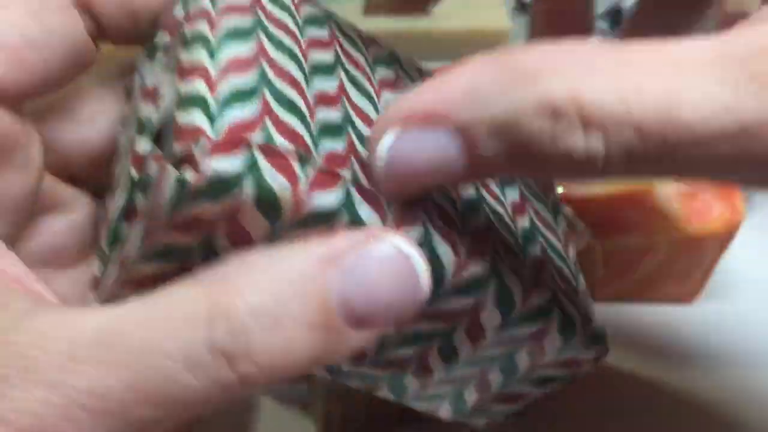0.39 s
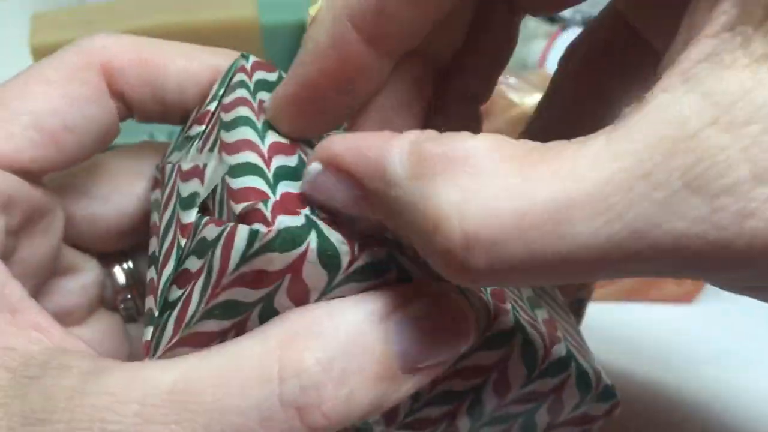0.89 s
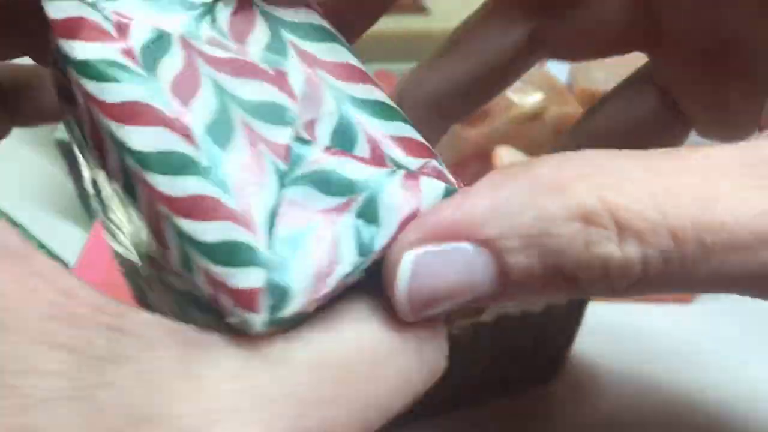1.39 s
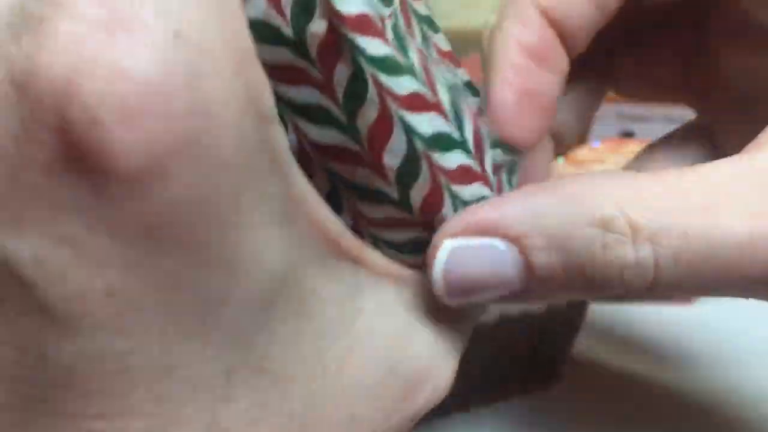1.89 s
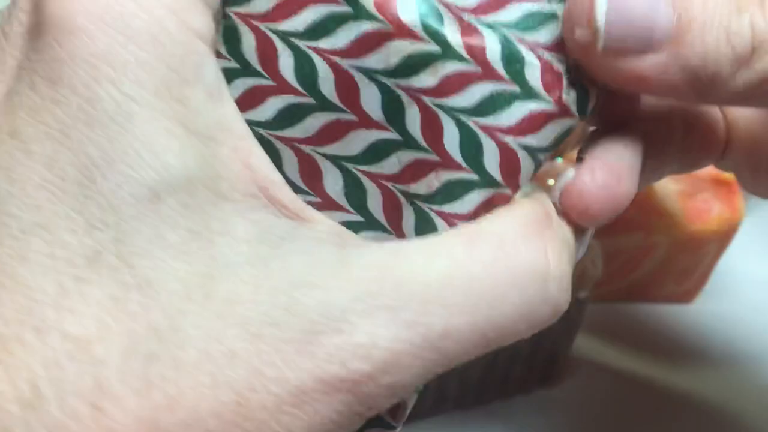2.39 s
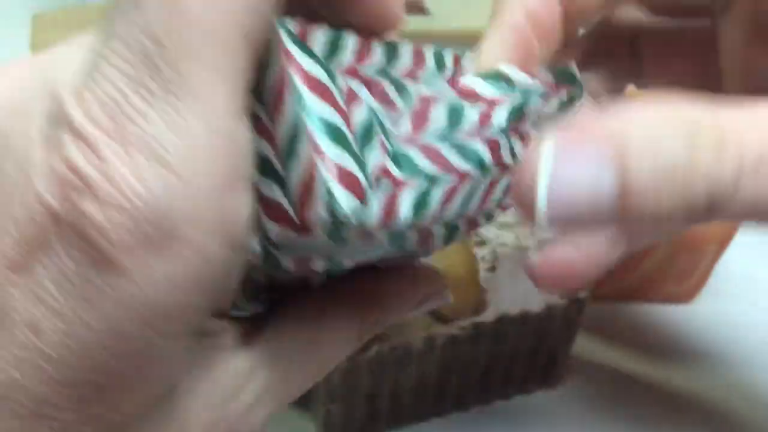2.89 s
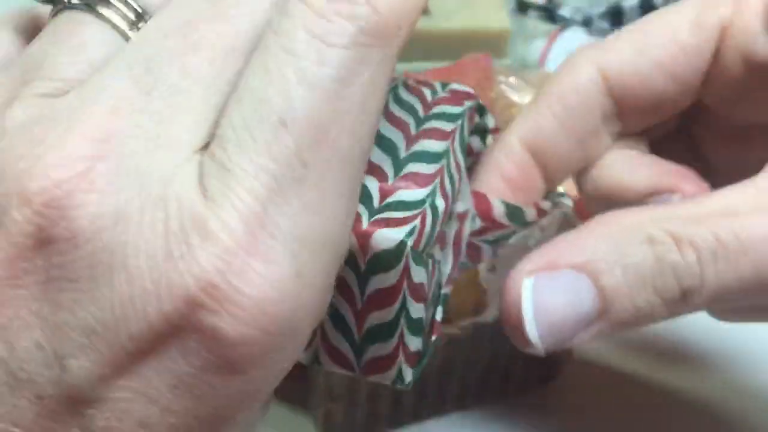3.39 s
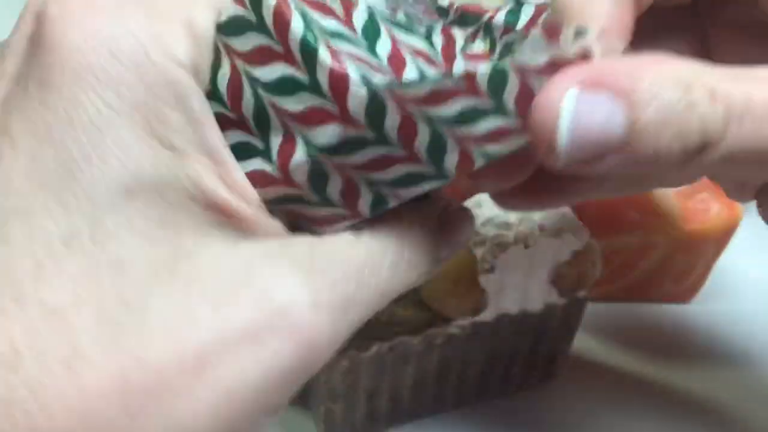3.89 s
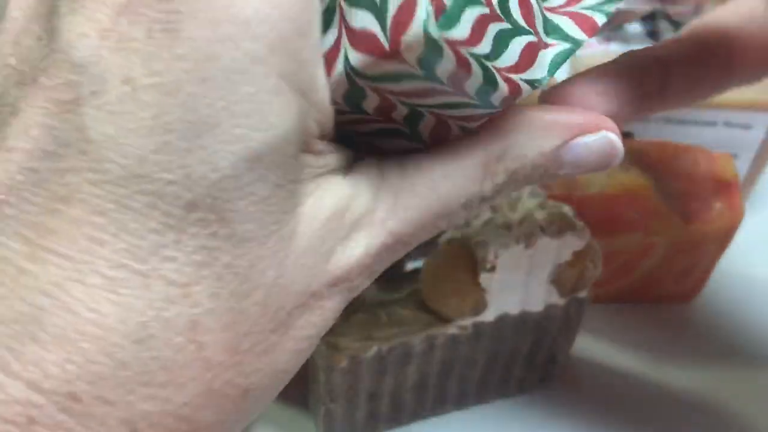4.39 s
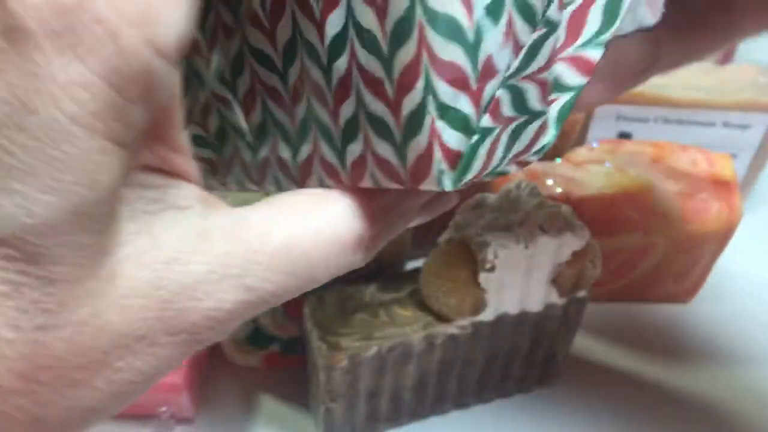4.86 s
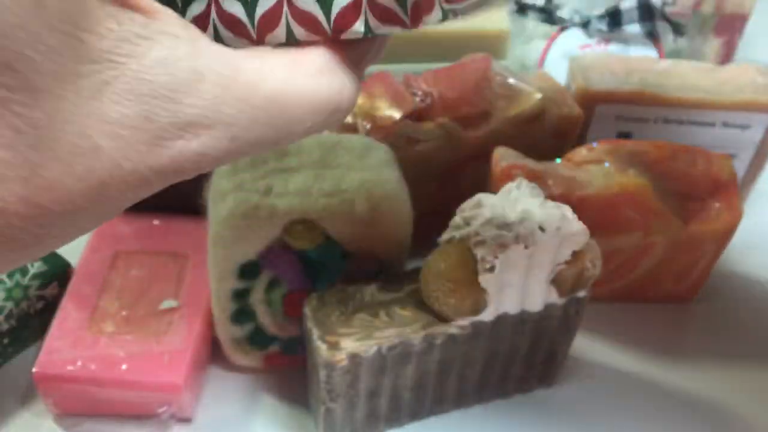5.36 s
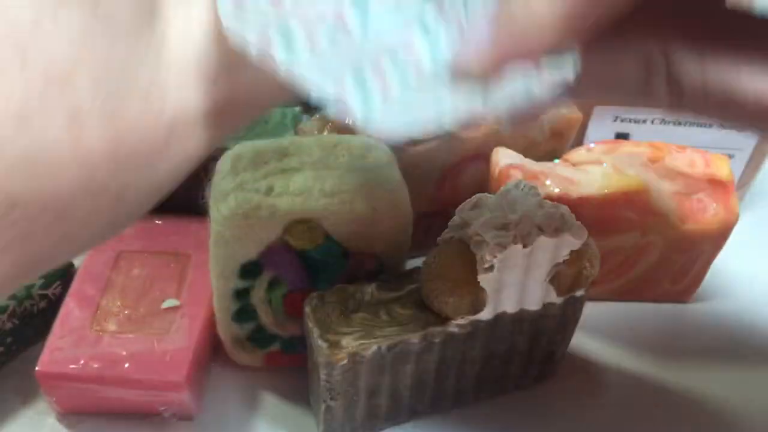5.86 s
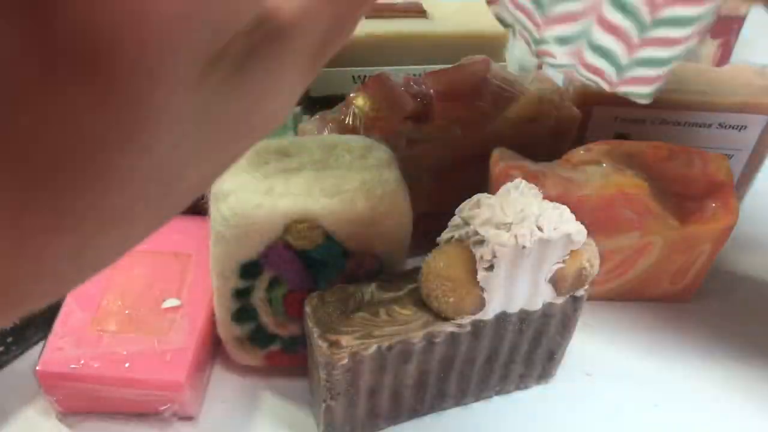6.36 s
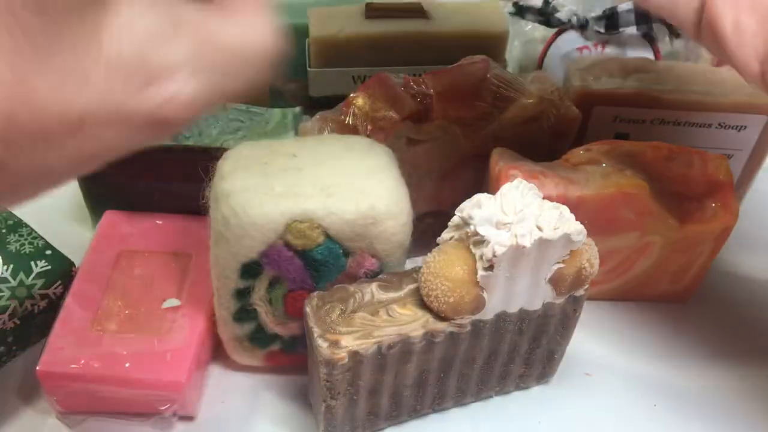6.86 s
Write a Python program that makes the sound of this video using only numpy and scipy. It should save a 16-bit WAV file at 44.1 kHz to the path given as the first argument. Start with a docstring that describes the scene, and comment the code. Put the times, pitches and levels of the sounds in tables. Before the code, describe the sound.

Stiff glossy gift paper crackles and snaps close up as fingers peel it off a small bar, swelling into loud crinkly rushes near the end.

```python
"""Ringing snaps and a rush of tiny crackles: fingers turn a small bar and peel stiff glossy gift paper off it.
Each snap is damped sines with noise; crackles and sliding hiss are shaped noise that swells with the hands.
The hands bump softly as low damped sines and dull noise, close to a phone microphone,
and a still room answers briefly and rumbles underneath."""
import sys
import numpy as np
from scipy import signal
from scipy.fft import rfft, irfft, next_fast_len
from scipy.io import wavfile
from scipy.ndimage import map_coordinates

SR = 44100
rng = np.random.default_rng(int(sys.argv[2]) if len(sys.argv) > 2 else 0)


def voltage_ratio(level):
    """Linear amplitude factor for a level in decibels (scalar or array-like)."""
    return 10 ** (np.asarray(level, float) / 20)


def output_pcm(signal):
    """Save a mono or channel-first signal as 16-bit PCM at the path in sys.argv[1].

    Samples are clipped to [-1, 1] before scaling.
    """
    pcm = np.clip(np.atleast_2d(signal).T, -1, 1) * 32767
    wavfile.write(sys.argv[1], SR, np.round(pcm).astype(np.int16))


N = 319725

# buckling creases: time_s [s], level_db [dB], ring_hz [Hz], crack_db [dB over level_db]
CREASES = [(0.037, -28, 3250, -10), (0.059, -25, 3020, -17), (0.0783, -17, 3260, -9.5),
           (0.106, -11.5, 3500, -6), (0.136, -24, 3340, -6), (0.145, -19, 3680, -1), (0.153, -25, 3300, -1),
           (0.1741, -24, 5660, 0), (0.199, -18, 3440, -6.5), (0.2328, -24, 4070, -22),
           (0.2568, -18, 3330, -9), (0.2612, -16.5, 3640, -17), (0.2787, -16, 3230, -11),
           (0.341, -28.5, 3150, -3), (0.4125, -23, 1880, -34), (0.4473, -27.5, 3730, -17),
           (0.511, -22.5, 3640, -13), (0.5153, -19, 4050, -14.5), (0.537, -22.5, 3560, -13),
           (0.5689, -23, 2330, -19), (0.5715, -17.5, 2430, -23), (0.6272, -32.5, 880, 5.5),
           (0.674, -35, 3280, -7), (0.715, -40.5, 3950, 1), (0.7711, -15, 3270, -26),
           (0.8352, -26, 1970, -23), (0.867, -32.5, 1600, -7.5), (0.9686, -26, 1970, -9),
           (0.9798, -25.5, 3000, -21), (1.0409, -10, 2110, -47), (1.071, -30, 2490, 2),
           (1.077, -32, 1990, 9), (1.168, -32, 2200, -25), (1.19, -26, 2080, -22), (1.2003, -29.5, 1770, 5),
           (1.2074, -19, 6240, -19), (1.2217, -27, 2350, 3), (1.2216, -29.5, 870, -34),
           (1.2542, -22, 4300, -12), (1.2978, -23.5, 4200, 3), (1.325, -35.5, 2430, 1),
           (1.477, -22.5, 3040, -13), (1.485, -17.5, 5200, -40), (1.654, -22, 3170, -20),
           (1.7837, -32, 4100, 7), (1.788, -26, 1410, -5), (1.8496, -22.5, 3500, -10.5),
           (1.9441, -25, 3450, -6), (2.0239, -32, 3340, 11), (2.059, -17.5, 3380, -40),
           (2.066, -13.5, 2120, -32), (2.078, -6, 3200, -26), (2.112, -20, 3680, -1.5),
           (2.139, -17.5, 2530, -14), (2.166, -17, 3300, -18), (2.2301, -7.5, 3520, -40),
           (2.2698, -17.5, 1610, -6), (2.2765, -10.5, 2410, -19), (2.3023, -16, 2260, -28),
           (2.308, -17.5, 1890, -7), (2.314, -11, 3340, -22), (2.344, -12, 3300, -28),
           (2.35, -14, 2440, -17), (2.3722, -14.5, 1630, -13), (2.3805, -19, 3420, -11),
           (2.4218, 0, 3080, -25), (2.4613, -31, 3400, 12), (2.4844, -5, 3010, -67),
           (2.511, -14.5, 2440, -45), (2.5187, -20, 3080, -23), (2.5523, -8.5, 2940, -24),
           (2.602, -6.5, 2760, -21.5), (2.637, -13, 3340, -16), (2.652, -9, 2500, -31),
           (2.6548, -6, 2500, -54), (2.659, -10, 3050, -38), (2.691, -19, 4100, -12),
           (2.726, -20.5, 3500, -6.5), (2.748, -14.5, 3400, -13), (2.8589, -16.5, 2800, -13),
           (2.8712, -16.5, 2860, -13), (2.9005, -12.5, 2740, -28), (2.9534, -18, 2920, -29),
           (3.0071, -13, 3450, -19), (3.024, -29, 2430, -8), (3.035, -16, 2930, -5),
           (3.066, -16.5, 1680, -10), (3.075, -7.5, 2660, -17), (3.082, -12, 3200, -7),
           (3.12, -15, 4500, -37), (3.128, -18, 3160, -21), (3.1465, -20, 4300, -6.5),
           (3.1534, -13.5, 3320, -24), (3.158, -8, 2680, -30), (3.185, -25.5, 3040, 5),
           (3.196, -9.5, 2900, -28), (3.2, -7, 3060, -13), (3.2833, -23, 3450, -11),
           (3.2986, -27, 3250, -6), (3.308, -20, 3830, -6.5), (3.316, -12, 3580, -10.5),
           (3.339, -19, 3180, -20), (3.3487, -17.5, 2900, -12), (3.386, -20.5, 3600, -4),
           (3.4112, -20.5, 5500, -17), (3.4367, -19, 3160, -14), (3.4414, -21.5, 3380, 0),
           (3.471, -33, 3480, 7.5), (3.533, -5, 3230, -28), (3.554, -4.5, 3570, -29),
           (3.6181, -13, 4140, -3.5), (3.6304, -10.5, 3880, -18), (3.64, -17, 3780, -4),
           (3.6856, -4.5, 3900, -35), (3.7287, -7, 2600, -1.5), (3.7651, -11.5, 1060, -7),
           (3.7832, -9, 3190, -9), (3.789, -7.5, 2770, -12), (3.8035, -3, 5440, -15),
           (3.8131, -13, 1320, -18), (3.8374, -17, 2520, 0), (3.844, -13.5, 1640, -13),
           (3.8546, -10.5, 2950, -19), (3.9336, -15.5, 2750, -55), (3.9703, -11.5, 3320, -28),
           (3.999, -13.5, 3250, -20), (4.016, -13, 3000, -11), (4.0388, -20, 2110, -16),
           (4.1028, -15, 3460, -15), (4.1156, -7, 3270, -34), (4.163, -20.5, 2540, -5.5),
           (4.185, -18.5, 3140, -16), (4.225, -17.5, 2500, -11), (4.311, -13, 2270, -37),
           (4.37, -6.5, 3360, -16), (4.4186, -18.5, 3160, -23), (4.472, -18, 2640, -6),
           (4.4986, -13, 3070, -16), (4.5688, -22.5, 3160, -42), (4.613, -19, 3260, -22),
           (4.6243, -23, 3250, 2), (4.6409, -10, 3400, -13.5), (4.6617, -12, 1660, -8.5),
           (4.6989, -17, 1380, -8), (4.732, -15.5, 3300, -10), (4.741, -7, 2120, -15),
           (4.804, -18.5, 3400, -11), (4.812, -16.5, 2480, -11), (4.8431, -13.5, 2320, -21),
           (4.865, -16.5, 1480, -33), (4.891, -18, 3300, -9), (4.9055, -6.5, 2230, -22),
           (4.9173, -12.5, 3230, -7), (4.96, -20.5, 3430, -13), (5.0016, -19.5, 2500, -5),
           (5.0656, -29, 3320, -20), (5.08, -20, 1370, -15), (5.121, -33, 2470, 4), (5.146, -23, 3100, -1),
           (5.177, -14, 3150, -13), (5.238, -16, 4130, -12), (5.246, -19, 3050, -13),
           (5.289, -20, 2050, -10), (5.311, -28, 3180, -2), (5.357, -14.5, 3300, 1),
           (5.371, -16, 2800, -14), (5.389, -9, 2800, -30), (5.402, -11, 2900, -24), (5.447, -8, 2530, -34),
           (5.471, -22.5, 4900, 4), (5.5106, -20.5, 2980, -7), (5.573, -27, 2850, -28),
           (5.6218, -20.5, 2900, -12), (5.666, -35.5, 3660, 13), (5.6822, -37.5, 6037, 18.5),
           (5.707, -25.5, 3320, -11), (5.764, -18, 2780, -20), (5.8323, -16, 2800, 7),
           (5.8517, -20.5, 2410, 5), (5.8614, -10, 3700, -2), (5.9575, -18, 3980, -36),
           (6.0142, -11.5, 2900, -16), (6.0282, -28, 2250, -21), (6.1646, -17.5, 3080, -12),
           (6.1725, -15, 1460, -12), (6.2077, -28, 3700, 0), (6.405, -11.5, 4368, -38),
           (6.433, -29.5, 2510, 11), (6.484, -11.5, 3150, -14), (6.4966, -24, 2560, -3),
           (6.5169, -12, 3190, 2.5), (6.519, -21, 560, -30), (6.564, -6, 2520, -19),
           (6.594, -17.5, 2540, 5.5), (6.686, -12.5, 1030, -18), (6.7036, -9, 1100, -25),
           (6.682, -5.5, 2530, -16), (6.7104, -1.5, 2970, -9.5), (6.7572, -14.5, 3360, -20),
           (6.8155, -9.5, 2420, -13), (6.8275, -10, 3670, -34), (6.9086, -25, 2650, -1),
           (6.9203, -32, 2600, -24), (6.9583, -21, 2680, -9), (6.966, -23, 1450, -19),
           (7.0044, -26.5, 3200, -5), (7.07, -28, 1450, -29), (7.1016, -18.5, 1390, -31),
           (7.1092, -21, 3270, -11), (7.2411, -11.5, 5750, -25)]
# colour of paper heard through the microphone: frequency_hz [Hz], gain_db [dB]
PAPER_COLOUR = [(88, -18), (150, -17), (348, -10), (494, -13), (637, -9.5), (1450, -3), (1900, -2),
                (2550, 2), (2850, -1.5), (3220, 4), (3800, -0.5), (4860, -5.5), (6140, -6), (7470, -16.5),
                (9440, -17.5), (14500, -29), (16000, -37)]


def unit(x):
    """Scaled to rms 1."""
    return x / np.sqrt(np.mean(x ** 2) + 1e-20)


def along(points, hz):
    """Reads (Hz, value) points on a log frequency axis."""
    point_hz, value = np.transpose(points)
    return np.interp(np.log(hz + 1), np.log(point_hz + 1), value)


def coloured(x, points):
    """Causal minimum-phase filter with the gain of the (Hz, dB) points."""
    size = 2 * next_fast_len(N // 2 + 4096)
    gain = voltage_ratio(along(points, np.fft.rfftfreq(size, 1 / SR)))
    cepstrum = irfft(np.log(gain), size)
    # folding the cepstrum forward makes the filter causal
    cepstrum[1:size // 2] *= 2
    cepstrum[size // 2 + 1:] = 0
    return irfft(rfft(x, size) * np.exp(rfft(cepstrum)), size)[:N]


def laid(start_s, shapes):
    """Sums one row of samples at each start time."""
    at = np.round(start_s * SR).astype(int)[:, None] + np.arange(shapes.shape[1])
    return np.bincount(at.ravel(), shapes.ravel(), N + SR)[:N]


def ring(hz, cycles, t, rise_s):
    """Damped sines that fall 60 dB in so many cycles."""
    return np.sin(2 * np.pi * hz * t) * voltage_ratio(-60 * t * hz / cycles) * (1 - np.exp(-t / rise_s))


def tilted(noise, lean):
    """Each row leans dull (lean > 0) or bright (lean < 0) by mixing in its previous sample."""
    return noise + lean * np.roll(noise, 1, axis=1)


def snaps():
    """A crease gives way within a millisecond: the freed facet rings briefly; crisp creases spray wide noise too."""
    time_s, level_db, ring_hz, crack_db = np.transpose(CREASES)[:, :, None]
    t = np.arange(768) / SR
    luck = rng.standard_normal((len(CREASES), 2 + 2 * len(t)))
    rough, crack = np.split(luck[:, 2:], 2, axis=1)

    # dull and low creases ring for more cycles
    cycles = 11 * voltage_ratio(2 * luck[:, :1] - 0.036 * (crack_db - 1)) * (ring_hz / 3000) ** -.4
    facet = ring(ring_hz, cycles, t, 0.00025)
    # a neighbouring facet beats against it
    neighbour_hz = ring_hz * (1.134 + 0.14 * luck[:, 1:2])
    facet += 0.49 * ring(neighbour_hz, 9.4, t, 0.00075)
    facet /= np.abs(facet).max(axis=1, keepdims=True)

    start_s = time_s[:, 0] - .0007
    swell = 1 - np.exp(-t / 0.00025)
    tone = laid(start_s, voltage_ratio(level_db - 0.95) * facet)

    rough_burst = rough * swell * voltage_ratio(-60 * t / 0.015)
    body = coloured(laid(start_s, voltage_ratio(level_db + 0.61 * crack_db + 8.5) * rough_burst), PAPER_COLOUR)

    crack_burst = tilted(crack, np.tanh(4.8 * luck[:, 1:2])) * swell * voltage_ratio(-60 * t / 0.0039)
    edge = [(4000, -43), (6500, -2.5), (9500, -2.5), (11000, -29.5), (13000, -11), (16000, -24.0)]
    bright = coloured(laid(start_s, voltage_ratio(level_db + crack_db + 8) * crack_burst), edge)
    return tone + body + bright


def rustle(spread_db=5.0, slide_db=-17):
    """Countless small creases crackle in clumps, each at its own pitch, over the hiss of paper sliding on paper."""
    # the sheet comes loose from the bar and turns to and from the microphone:
    # time_s [s], brightness_db [dB], fullness_db [dB]
    sheet = [(0, 4, 2), (0.7, 3, 9.5), (1.3, 5, -1.5), (2.1, -3, -2), (2.9, 1, -2.5), (3.6, -2, -0.5),
             (4.3, 1, 1.5), (5.002, -1, -5.5), (5.4, -4.5, 0), (5.84, 4, 2.5), (6.2, 0.5, 3),
             (6.55, 2.5, 2), (6.72, -1.5, 11.5), (7.25, -3, -5.5)]
    level_db = effort()
    time_s, *columns = np.transpose(sheet)
    bright_db, full_db = (np.interp(np.arange(N) / SR, time_s, c) for c in columns)

    # hard pulls blur the crackle into an even rush
    force = np.clip((level_db + 43) / 20, 0, 1)
    luck = rng.random((7000, 5))  # one row a crackle
    hard = force[(luck[:, :1] * N).astype(int)]
    size = voltage_ratio(-spread_db * ((1 - 0.25 * hard) * np.log(luck[:, 1:2] + 0.025) - 0.62 * hard))

    t = np.arange(256) / SR
    puff = tilted(rng.standard_normal((len(luck), len(t))), 1.44 * (luck[:, 4:] - .5))
    puff *= voltage_ratio(-60 * t / (0.0013 + 0.011 * luck[:, 2:3])) * (1 - np.exp(-t / 0.0004))
    burst = puff + 0.71 * ring(800 * 10 ** luck[:, 3:4], 4.76, t, 0.000079)
    crackle = unit(laid(luck[:, 0] * N / SR, size * burst))
    slide = voltage_ratio(slide_db + 14.0 * force) * rng.standard_normal(N)

    # about 55 random levels a second, joined smoothly
    wander = map_coordinates(rng.standard_normal(400), [np.linspace(0, 399, N)])
    clumps = voltage_ratio((3.5 - 1.4 * force) * wander)
    # a snap sets its neighbours off
    after = np.arange(SR // 20) / SR
    wake = laid(np.array(CREASES)[:, 0], np.tile(voltage_ratio(-60 * after / 0.051), (len(CREASES), 1)))
    clumps *= force + (1 - force) * (0.84 + np.minimum(wake, 1))

    paper = coloured(unit(clumps * (crackle + slide)), PAPER_COLOUR)
    mid = coloured(paper, [(600, -40), (1200, 0), (5500, 0), (8000, -30)])
    top = coloured(paper, [(4000, -40), (6500, 0)])
    bottom = coloured(paper, [(1000, 0), (2000, -40)])
    scale = voltage_ratio(level_db) / np.std(mid)
    return scale * (mid + voltage_ratio(bright_db) * top + voltage_ratio(full_db) * bottom)


def effort():
    """Rustle level in dB: every move swells to its peak and fades, and overlapping moves add up in power."""
    # hand moves that work the paper: peak_s [s], peak_db [dB], swell_s [s], fade_s [s]
    moves = [(0.04, -33.5, 0.037, 0.094), (0.15, -33.5, 0.018, 0.044), (0.25, -40, 0.26, 0.17),
             (0.57, -47.5, 0.088, 0.077), (0.76, -50, 0.13, 0.037), (0.97, -53.5, 0.15, 0.4),
             (1.19, -41.5, 0.048, 0.099), (1.33, -38, 0.11, 0.036), (1.53, -35.5, 0.15, 0.19),
             (1.659, -43, 0.0099, 0.053), (1.77, -43, 0.12, 0.089), (1.978, -30.5, 0.063, 0.061),
             (2.11, -35.5, 0.1, 0.23), (2.3, -33, 0.094, 1), (2.63, -36, 0.16, 0.022),
             (2.9, -28, 0.27, 0.025), (3.02, -36.5, 0.075, 0.31), (3.2, -34.5, 0.066, 0.092),
             (3.35, -39.5, 0.11, 0.22), (3.642, -31.5, 0.09, 0.067), (3.79, -26.5, 0.11, 0.19),
             (4.118, -32.5, 0.37, 0.042), (4.373, -33.5, 0.39, 0.094), (4.47, -42, 0.017, 0.1),
             (4.73, -32.5, 0.31, 0.17), (4.89, -40.5, 0.058, 0.1), (5.06, -34.5, 0.08, 0.22),
             (5.39, -28, 0.36, 0.15), (5.487, -26, 0.034, 0.0051), (5.626, -32, 0.15, 0.026),
             (5.7, -46, 0.11, 0.074), (5.79, -36, 0.021, 0.067), (5.843, -21.5, 0.059, 0.099),
             (5.901, -22, 0.095, 0.043), (5.99, -30, 0.048, 0.044), (6.179, -36, 0.03, 0.012),
             (6.09, -43.5, 0.11, 0.12), (6.285, -27, 0.036, 0.034), (6.49, -32, 0.029, 0.11),
             (6.56, -23.5, 0.039, 0.12), (6.622, -19, 0.15, 0.11), (6.703, -25, 0.047, 0.021),
             (6.823, -24.5, 0.043, 0.03), (7.0, -36.5, 0.24, 0.56), (7.112, -29, 0.015, 0.047),
             (7.25, -24, 0.029, .05)]
    swing_db = 15  # rise over one swell time, fall over one fade time
    t = np.arange(0, N, 64) / SR
    peak_s, peak_db, swell_s, fade_s = np.transpose(moves)[:, :, None]
    before = (peak_s - t) / np.maximum(swell_s, .005)
    after = (t - peak_s) / np.maximum(fade_s, .005)
    away = np.where(t < peak_s, before, after)
    power = np.sum(voltage_ratio(peak_db - swing_db * away) ** 2, axis=0)
    return np.interp(np.arange(N) / SR, t, 10 * np.log10(power))


def bumps():
    """Hands and bar knock softly: one low push and a dull flap of air."""
    # soft bumps: start_s [s], level_db [dB, before the gain of each part], pitch_hz [Hz]
    knocks = [(0.105, -35, 200), (0.192, -41, 183), (1.75, -46, 191), (1.996, -46, 163),
              (2.337, -31.5, 353), (5.377, -26, 352), (6.655, -34, 336), (6.93, -41, 53),
              (7.005, -25.5, 267), (7.108, -43, 46.6)]
    start_s, level_db, pitch_hz = np.transpose(knocks)[:, :, None]
    t = np.arange(SR // 10) / SR
    push = laid(start_s[:, 0], voltage_ratio(level_db + 15.5) * ring(pitch_hz, 4.6, t, 0.004))
    puff = rng.standard_normal((len(start_s), len(t))) * voltage_ratio(-60 * t / 0.25) * (1 - np.exp(-t / 0.0013))
    flap = laid(start_s[:, 0], voltage_ratio(level_db + 22.5) * puff)
    return push + coloured(flap, [(60, -22.5), (250, -12.5), (900, -43.5)])


def room(x):
    """A short answer from table and walls: noise that decays at its own rate in each band, treble soonest."""
    # reverberation: frequency_hz [Hz], t60_s [s to fall 60 dB]
    decay = [(300, 0.04), (2000, 0.046), (10000, 0.025)]
    hz, t, bands = signal.stft(rng.standard_normal(SR // 4), SR, nperseg=256)
    fading = bands * voltage_ratio(-60 * t / along(decay, hz)[:, None])
    tail = signal.istft(fading, SR, nperseg=256)[1]
    delayed = np.pad(x, (130, 0))  # about 3 ms
    return signal.fftconvolve(delayed, tail / np.linalg.norm(tail))[:N]


def floor():
    """Low room rumble and faint hiss, both steady coloured noise."""
    # rumble colour: frequency_hz [Hz], gain_db [dB]
    rumble_colour = [(21, -31), (36, 3), (76, -3), (114, -2.5), (157, -16.5), (194, -11.5), (500, -31.5),
                     (650, -65), (1100, -120)]
    hiss_colour = [(400, -20), (2500, 0), (11000, -28)]
    rumble = voltage_ratio(-52) * unit(coloured(rng.standard_normal(N), rumble_colour))
    hiss = voltage_ratio(-62) * unit(coloured(rng.standard_normal(N), hiss_colour))
    return rumble + hiss


def scene():
    """Paper, hands and room at one microphone."""
    paper = snaps() + rustle()
    return (paper + voltage_ratio(-18.0) * room(paper) + bumps() + floor())[None]


def top_cut(x):
    """Nothing passes above the cut-off."""
    return signal.sosfilt(signal.butter(12, 16650, fs=SR, output="sos"), x)


def record(dry):
    """The phone rolls off the very top."""
    heard = coloured(dry[0], [(15700, -1.0), (16000, -16), (16700, -40)])
    return top_cut(heard[None])


dry = scene()
out = record(dry)
output_pcm(out)
```